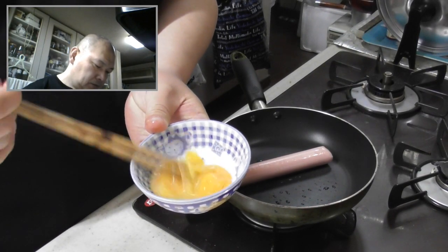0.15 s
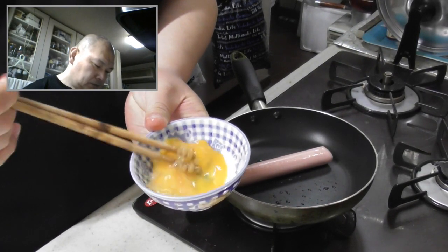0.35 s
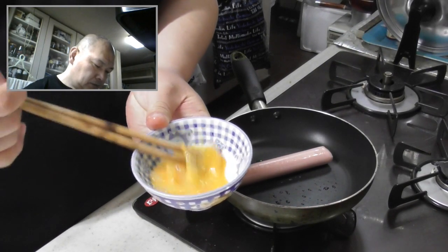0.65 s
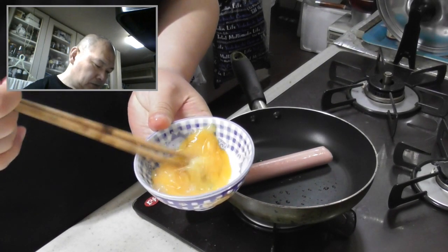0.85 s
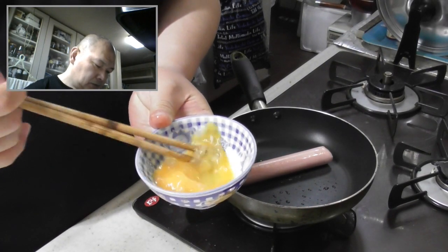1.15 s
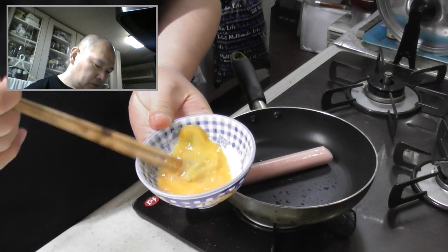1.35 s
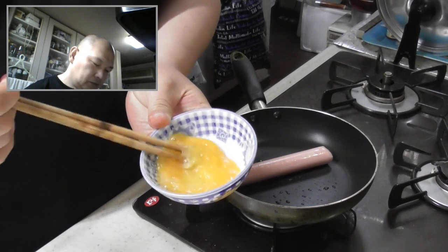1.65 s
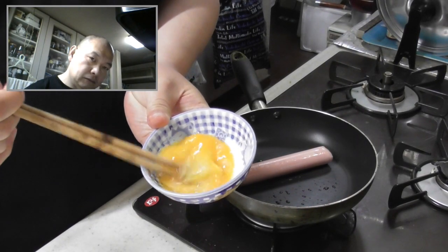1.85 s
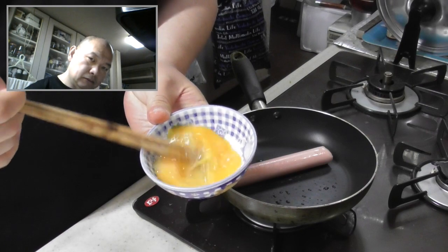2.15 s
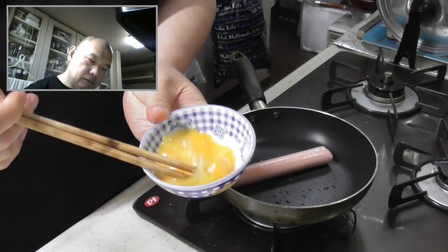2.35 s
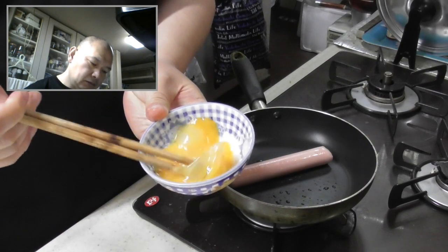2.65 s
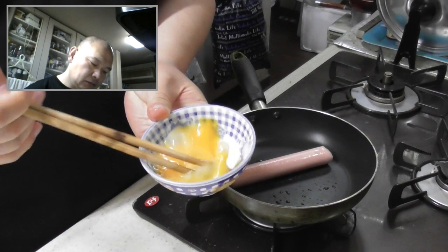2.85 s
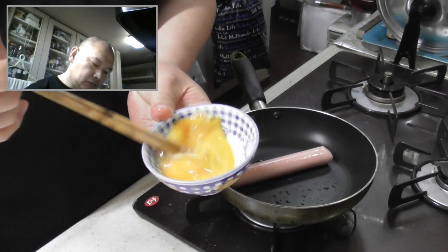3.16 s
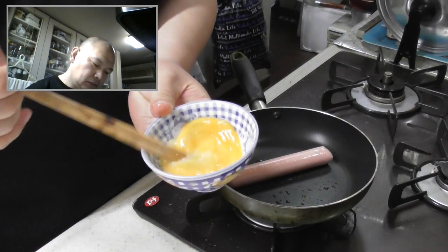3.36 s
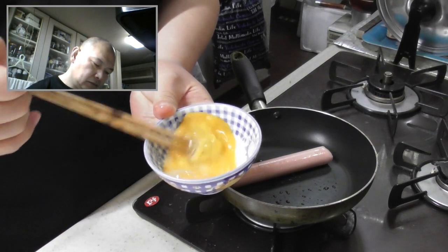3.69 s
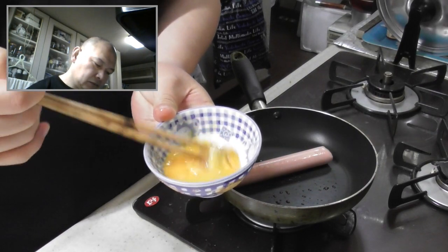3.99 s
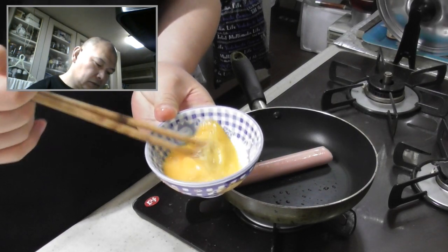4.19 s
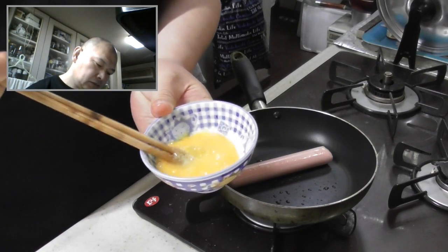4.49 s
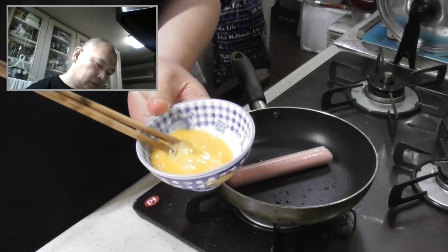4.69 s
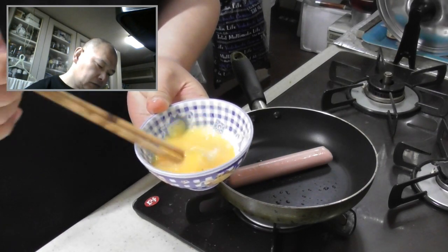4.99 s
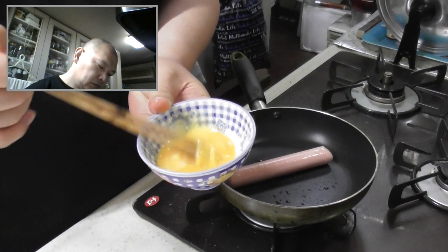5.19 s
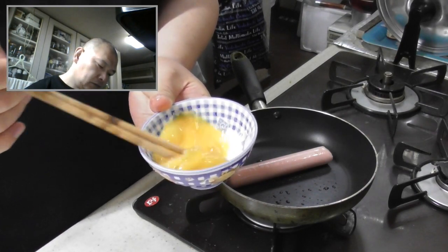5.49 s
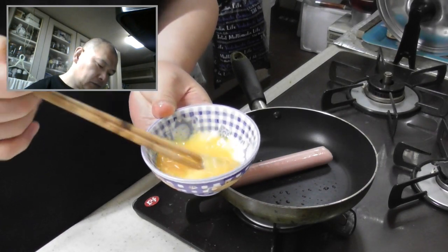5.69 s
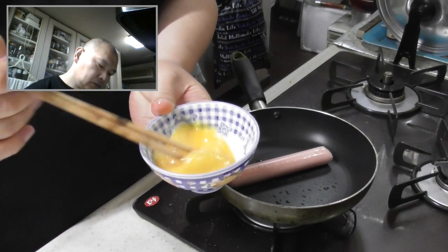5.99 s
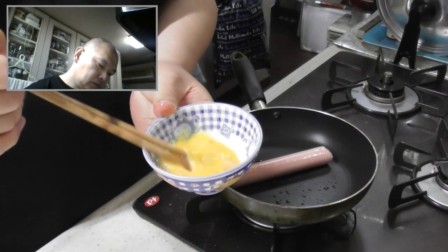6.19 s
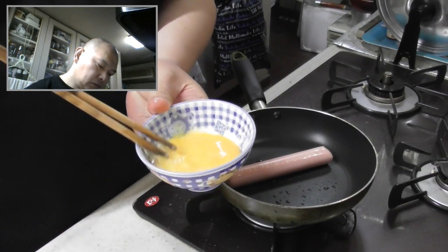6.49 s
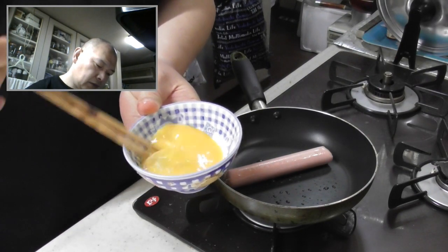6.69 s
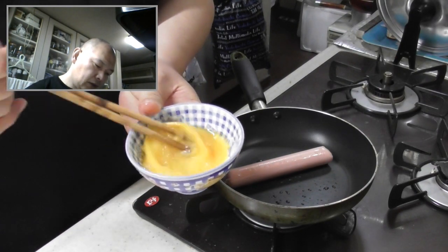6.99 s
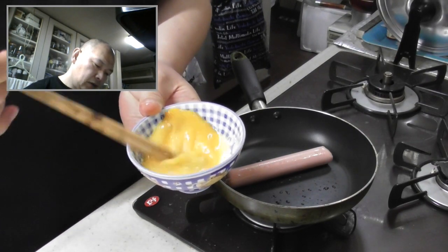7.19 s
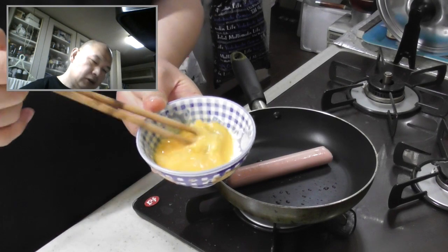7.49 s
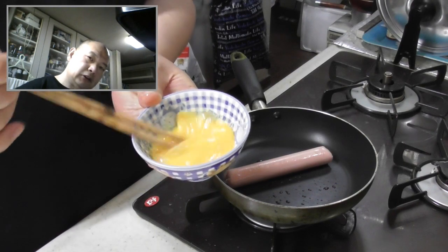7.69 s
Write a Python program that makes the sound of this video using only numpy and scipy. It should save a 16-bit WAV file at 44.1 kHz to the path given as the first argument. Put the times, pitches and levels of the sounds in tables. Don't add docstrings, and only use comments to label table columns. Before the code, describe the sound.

Close to a thin microphone, wooden chopsticks beat egg in a small porcelain bowl, about six strokes a second, each a sharp tick with a brief ceramic ring and wet slap. A pan sizzles steadily behind, with bright spits of fat. After three seconds the beating loosens into uneven bouts with gulping air bubbles. The small kitchen adds a short, hard echo.

```python
import sys
import numpy as np
from scipy import signal
from scipy.io import wavfile
from scipy.ndimage import uniform_filter1d

SR = 44100
rng = np.random.default_rng(int(sys.argv[2]) if len(sys.argv) > 2 else 0)


def amplitude_ratio(level_db):
    exponent = np.asarray(level_db, float) / 20
    return 10 ** exponent


def put_to_file(sound):
    columns = np.atleast_2d(sound).T
    safe = np.clip(columns, -1, 1)
    whole_steps = np.round(safe * 32767)
    wavfile.write(sys.argv[1], SR, whole_steps.astype(np.int16))


N = 346185

# time in seconds, level in dB.
FRY_LEVEL = [(0.0, -20), (1.38, -22), (1.94, -22), (2.58, -20), (3.0, -22), (3.52, -22), (3.96, -22),
             (4.6, -21), (4.91, -19), (5.1, -21.5), (5.55, -22.5), (6.34, -22), (6.6, -23), (7.15, -22),
             (7.48, -23), (7.85, -24.5)]
# frequency in Hz, level in dB per Hz.
PAN_COLOUR = [(24, -90), (40, -37.5), (742, -36), (1160, -21), (1570, -10), (2220, -13), (2790, -8),
              (3240, -13), (3670, -10.5), (5330, -6.5), (6350, 3), (7750, 10), (11800, -10.5), (13800, -10),
              (15600, -17)]
# frequency in Hz, width in Hz, boost in dB.
PAN_RESONANCES = [(1494, 92, 11), (2740, 87, 2), (3600, 190, 9.5), (4166, 230, 6), (4850, 61, 4.5),
                  (5410, 150, -4.5), (6600, 880, -0.5), (7770, 2320, -8)]
# frequency in Hz, time to fade by 60 dB in seconds.
KITCHEN_FADE = [(500, 0.13), (2000, 0.11), (5000, 0.18), (12000, 0.016)]
# start in
# seconds, level in dB.
BIG_SPITS = [(3.517, -3), (4.81, -3), (4.94, -3), (6.55, -4), (.0533, -1), (.0942, 0), (.3167, -1),
             (.4334, -1), (.5671, -2), (1.0236, -3), (1.0695, -2), (1.2216, -3), (1.3628, -2), (1.506, -2),
             (1.6526, -1), (2.1525, -1), (2.37, -2), (2.5496, -3), (2.8928, 1), (4.114, -3), (4.7536, -2),
             (4.8893, -2), (5.012, 0), (5.2964, -2), (5.4071, -2), (5.7648, -2), (5.8441, 0), (7.3467, -3),
             (7.4041, -3), (7.6889, 0)]
SMALL_SPITS = [.3651, .8954, 1.2012, 1.482, 1.6127, 1.6921, 1.8038, 2.0438, 2.4468, 2.9442, 2.9916, 3.1782,
               3.3902, 4.1051, 4.2792, 4.5286, 4.5875, 5.1472, 5.255, 5.3148, 5.4395, 5.7473, 5.9813,
               6.0721, 6.1893, 6.573, 6.8289, 7.0748, 7.427, 7.8271]
# start in seconds, level in dB, pitch in Hz.
STRAND_SNAPS = [(0.1336, -17, 1840), (0.2516, -12, 1870), (0.2974, -17, 1590), (0.3884, -15, 1620),
                (1.278, -14.5, 2810), (1.8043, -20, 2780), (2.2952, -22, 1490), (2.3286, -16, 1530),
                (2.3855, -19, 1920), (2.4758, -19, 2000), (2.5576, -13.5, 1850), (2.6275, -29, 1880),
                (2.7995, -17, 1880), (2.8404, -14, 1980), (3.0645, -16, 2760), (3.243, -17, 2620),
                (3.3692, -19.5, 2630), (3.526, -18, 2360), (3.7028, -16.5, 1560), (4.0867, -12, 2660),
                (4.53, -21, 2820), (4.587, -25, 1480), (5.511, -17, 1580), (5.5174, -19, 1910),
                (5.7473, -29, 1660), (5.7648, -22, 2800), (5.941, -21, 1920), (5.9683, -17, 3160),
                (6.1045, -10, 1950), (6.6765, -16, 1450), (6.696, -23, 1500), (6.7311, -20, 2640),
                (7.01, -22, 1900), (7.0174, -19, 1950), (7.1685, -18, 1880), (7.2789, -18, 2770),
                (7.3407, -16.5, 1960), (7.4739, -21, 1900), (7.5929, -19, 1810)]
# start in seconds, level in dB, pitch in Hz.
SLOSHES = [(6.141, -12, 2000), (.796, -22, 1480), (6.577, -21.5, 1660), (1.531, -12, 3420),
           (0.63, -24.5, 1660), (0.7848, -10.5, 1885), (.8125, -20, 1910), (0.913, -14.5, 1930),
           (1.2247, -10.5, 1910), (1.3348, -26, 2010), (1.3458, -20, 2200), (1.513, -14, 1900),
           (1.673, -22, 1980), (2.334, -21, 1590), (2.4927, -15.5, 1990), (0.0842, -7.5, 3170),
           (3.6173, -20, 1910), (3.7896, -23, 1880), (4.047, -20, 1920), (4.2113, -18.5, 1920),
           (4.33, -21, 1420), (4.373, -17, 1910), (4.393, -13, 1820), (4.8493, -25, 1740),
           (4.976, -21, 2300), (5.808, -18.5, 1930), (6.103, -30, 2080), (6.662, -19.5, 1890),
           (7.0804, -20.5, 1930), (7.1194, -23, 1750), (7.21, -28, 2020), (7.509, -20.5, 2300),
           (7.5247, -25, 1430), (7.599, -18, 1860)]
# start in seconds, level in dB, pitch in Hz,
# time to fade by 60 dB in seconds, rise in octaves per second.
GULPS = [(0.088, -6.5, 1340, 0.018, 11), (.252, -16, 1040, 0.022, 27), (0.78, -16, 855, 0.16, 30),
         (2.841, -18, 780, 0.069, 0.81), (2.873, -22.5, 777, 0.065, 1), (3.526, -21.5, 1190, 0.026, 8.8),
         (3.926, -24, 1140, 0.04, 7.8), (4.045, -27, 1013, 0.17, 8.7), (4.091, -26, 1058, 0.14, 4),
         (4.21, -20.5, 980, 0.016, 7), (4.331, -16.5, 1300, 0.061, 1.8), (4.372, -20.5, 1080, 0.024, 8),
         (4.53, -34, 1110, 0.033, 6.8), (5.316, -12.5, 1044, 0.054, 1.9), (5.497, -36, 710, 0.11, 1.3),
         (5.601, -26, 1010, 0.024, 5), (5.667, -19, 1590, .2, 0.53), (5.997, -12, 1380, 0.051, 12),
         (6.105, -25.5, 1160, 0.034, 8.8), (6.73, -26, 1250, 0.042, 3.4), (6.95, -17, 1300, 0.035, 4.8),
         (7.241, -25, 904, 0.043, 2.1), (7.522, -25, 1040, 0.025, 6)]
# start in seconds, level in dB, pitch in Hz, length in seconds.
BIG_POCKET = (5.824, -1.5, 1830, .0072)
# start in seconds, level in dB.
JOLTS = [(.0845, -48), (.4, -45), (0.5546, -45), (1.5299, -46), (2.1523, -53), (2.361, -49), (2.657, -51),
         (5.824, -43.5), (6.189, -46.5), (6.95, -48), (7.223, -56), (0.719, -38), (0.8814, -37.5),
         (1.036, -39.5), (1.2031, -35), (1.3653, -42), (1.6926, -34.5), (1.8587, -45), (2.1779, -47),
         (2.893, -37.5), (3.178, -37.5), (3.389, -38.5), (3.5588, -28), (3.7333, -35), (3.91, -39),
         (4.405, -44), (5.147, -44), (5.2978, -47), (5.3333, -39.5), (5.657, -42), (5.982, -41),
         (6.1386, -44), (6.573, -33), (6.8895, -47), (7.0434, -44), (7.3828, -50), (7.6887, -43)]
# frequency in Hz, level in dB.
TICK_COLOUR = [(300, 3), (900, -16.5), (1500, 10), (2500, -2), (3700, 18), (4600, 3), (7000, 2.5),
               (15000, -6)]
# frequency in Hz, level in dB, time to fade by 60 dB in seconds.
BOWL_DEEP = [(1586, -0.97, 0.1)]
BOWL_LOW = [(2270, -34, 0.012), (2740, 1, 0.019), (2857, -8, 0.021), (3286, 6, 0.008), (3630, -24, 0.19)]
BOWL_MID = [(3580, -2, .04), (3655, -9, .09), (3726, -4, .055), (3860, -9, .02)]
BOWL_HIGH = [(6320, -9, .04), (6400, -1, .028), (6480, -5, .03)]
# start in seconds,
# blow in dB, place on the bowl (low towards the wall, high towards the rim), egg slap in dB, slap pitch in Hz.
BEATING_STROKES = [(0.0836, -6.5, 0.4, -16, 1900), (.2279, -6, 1, -18.5, 1920),
                   (0.4, 0.5, -0.25, -15.5, 1720), (0.5545, -2, -0.5, -12, 1693),
                   (0.7183, 2.5, 0.5, -14.5, 1830), (0.8806, 1, -0.5, -19, 1684),
                   (1.036, -0.5, 1.1, -21.5, 2300), (1.183, -8, 1.8, -20, 1840),
                   (1.2017, 2.5, 0.2, -20, 2500), (1.3658, 2, 1, -24.5, 1560), (1.53, 1, 0.8, -30, 1870),
                   (1.6923, 2.5, -0.5, -20, 1820), (1.8596, -3.5, 0.5, -14.5, 1900),
                   (2.015, -10, 0.4, -26, 1910), (2.178, -5.5, 1, -18, 2330), (2.223, -8.5, 1.3, -19, 3380),
                   (2.3618, -3.5, 0.2, -32, 1900), (2.411, -19, -0.5, -18, 1780),
                   (2.432, -21, 3.5, -15, 1830), (2.654, -18.5, 4.5, -11.5, 1935),
                   (2.8164, -10, -0.1, -15.5, 1920), (2.9863, -7.5, -0.5, -22, 1550),
                   (3.1787, -4, -1, -10.5, 1800),
                   (3.39, -0.5, -1.36, -20, 2090), (3.5588, 2, 0.2, -19, 2180), (3.7323, 4, 2.2, -15.5, 1985),
                 (3.911, 2.5, 1.6, -20, 1526), (4.085, -16, 3.5, -21, 1890), (4.2563, -14, 0, -14, 1910),
                 (4.4051, -0.5, -0.3, -16, 1930), (5.1472, -1.5, -0.7, -41, 1990),
                 (5.334, -4, -1.16, -26.5, 1620), (5.439, -12, 0.5, -21, 1880),
                 (5.657, -3.5, -0.6, -19.5, 2000), (5.8067, -5, 0, -36, 1760), (5.981, -0.5, 0, -17, 2340),
                 (6.1389, 1.5, 0.7, -6.5, 2360), (6.258, -5.5, 0.3, -23, 2370),
                 (6.573, -0.5, -0.3, -9, 1940), (6.89, -2.5, -1, -33, 1600), (6.9492, -8, 0.1, -14, 1910),
                 (7.044, 2.5, 0.2, -12, 1980), (7.223, 1, 2, -30, 2100), (7.3834, -4, 0, -26, 2010),
                 (7.4034, -12, 2, -11, 2710), (7.6894, 0, 1, -16.5, 1697), (7.763, -13, 2.85, -18, 2350)]
# start in seconds, blow in dB, place on the bowl.
GRAZES = [(.5327, -20, 1.8), (.7936, -23, 2.5), (1.338, -16, 5), (1.5, -16, -1), (1.592, -23, 3),
          (2.0662, -17.5, -1.1), (2.2004, -16, -1.5), (3.2613, -13.5, 0.5), (4.019, -16.5, 1),
          (4.3902, -14, -2), (5.2974, -14, 1.4), (6.105, -10, 2.2), (6.6644, -15.5, 2.2),
          (6.8016, -28.5, -2), (7.1197, -9, 0.42), (7.196, -16, -0.5), (7.21, -4.5, 0.5),
          (7.5224, -11, 2.3)]
STROKES = BEATING_STROKES

FRY_MEAN_DB, BODY_DB, BODY_SWING = -21.5, -21.5, 2.02
STEADY_BELOW_HZ = 800
LULL_DB, LULL_LEAD_S, LULL_S = -4.5, .012, 0.0039
TICKS_PER_S, TICKS_DB, TICKS_HZ = 60, -13.5, 9500
SMALL_SPIT_DB, SPIT_HZ, SPIT_SPREAD = -4.5, 7500, .06
SPIT_TILT_DB = 5
HOB_ECHO_S, HOB_ECHO_DB = .0022, -5
SLAP_LAG_S, SLAP_S = 0.001633, 0.0076
GULP_WAVER = .035
GRAZE_TICK_DB = 2
MID_DB, LOW_DB, HIGH_DB = -9.5, -11.5, -6
MID_DB_PER_PLACE, LOW_DB_PER_PLACE, HIGH_DB_PER_PLACE = -8, 4.5, -4.5
SECOND_STICK_DB, SECOND_STICK_S = -2.5, .003
DETUNE, RING_ROUGH = .005, .55


def evened(x):
    return x / np.sqrt(np.mean(x ** 2) + 1e-20)


def read(points, hz):
    f, value = np.transpose(points)
    return np.interp(np.log(hz + 1), np.log(f + 1), value)


def add(mix, s, sound):
    part = mix[round(s * SR):][:len(sound)]
    part += sound[:len(part)]


def causal(db):
    log_gain = np.log(amplitude_ratio(np.maximum(np.r_[db, db[-2:0:-1]], -100)))
    return np.fft.ifft(np.exp(log_gain - 1j * signal.hilbert(log_gain).imag)).real[:len(db)]


def ring(modes, t, chance):
    out = 0
    for (hz, db, t60), c in zip(modes, chance):
        tuned = hz * (1 + DETUNE * np.sin(40 * c))
        out = out + amplitude_ratio(db + 2.04 * c - 60 * t / t60) * np.sin(2 * np.pi * tuned * t + 7 * c)
    return out


def blip(t, hz, t60, rise, swell):
    pitch = hz * 2 ** (rise * t)
    fade = amplitude_ratio(-60 * t / max(t60, .005))
    return np.sin(2 * np.pi * np.cumsum(pitch) / SR) * (1 - np.exp(-t / swell)) * fade


def kitchen(x):
    taps = np.zeros(SR // 2)
    at = np.arange(160, len(taps) - 20, 20)
    taps[at + rng.integers(0, 20, len(at))] = rng.choice([-1., 1.], len(at))
    hz, t, z = signal.stft(taps, SR, nperseg=128)
    tail = signal.istft(z * amplitude_ratio(-60 * t / read(KITCHEN_FADE, hz)[:, None]), SR, nperseg=128)[1]
    return signal.fftconvolve(x, tail / np.linalg.norm(tail))[:N]


def pan_colour(hz):
    peaks = sum(db / (1 + (2 * (hz - f) / width) ** 2) for f, width, db in PAN_RESONANCES)
    return read(PAN_COLOUR, hz) + peaks


def lull(times):
    dip = 0
    for s, db, *_ in STROKES:
        firmness = 1 / (1 + amplitude_ratio(-db - 12))
        dip = dip + LULL_DB * firmness * np.exp(-((times - s + LULL_LEAD_S) / LULL_S) ** 2)
    return dip


def sizzle():
    clumps = evened(uniform_filter1d(rng.standard_normal(N), 250))
    crowding = amplitude_ratio(4.0 * clumps + 1.5 * evened(uniform_filter1d(clumps, 1200)))
    bursting = rng.random(N) < 2500 / SR * crowding
    strength = amplitude_ratio(4.2 * np.minimum(rng.exponential(1, N), 4.3))
    crackle = bursting * rng.choice([-1, 1], N) * strength

    t = np.arange(60) / SR
    tones = np.geomspace(1500, 14000, num=12)
    which = rng.integers(0, len(tones), N)
    fizz = np.zeros(N)
    for k, hz in enumerate(tones):
        tone = np.sin(2 * np.pi * hz * t) * np.exp(-t * hz / 2.2)
        fizz += evened(signal.oaconvolve(crackle * (which == k), tone)[:N]) * np.sqrt(hz)

    hiss = amplitude_ratio(2.0 + 0.99 * evened(uniform_filter1d(clumps, 500))) * rng.standard_normal(N)
    raw = amplitude_ratio(-5.5) * evened(crackle) + amplitude_ratio(-5.5) * evened(fizz) + hiss
    hz, frames, z = signal.stft(raw, SR, nperseg=512)
    z = z / np.sqrt(uniform_filter1d((abs(z) ** 2).mean(1), 9))[:, None]

    fry_db = np.interp(frames, *np.transpose(FRY_LEVEL))
    high = (1 / (1 + (5200 / (hz + 1)) ** 8))[:, None]
    swinging = 1 / (1 + (STEADY_BELOW_HZ / (hz[:, None] + 1)) ** 4)
    body_db = BODY_DB + lull(frames) + BODY_SWING * (fry_db - FRY_MEAN_DB) * swinging
    level_db = high * fry_db + (1 - high) * body_db
    patches = uniform_filter1d(uniform_filter1d(rng.standard_normal(z.shape), 5, 0), 8, 1)
    level_db = level_db + (1.2 + .9 * (1 - high)) * evened(patches)

    shape = amplitude_ratio(pan_colour(hz))[:, None]
    shape = shape / np.sqrt((shape ** 2).sum())
    return amplitude_ratio(-1.0) * signal.istft(z * shape * amplitude_ratio(level_db), SR, nperseg=512)[1][:N]


def ticks():
    t = np.arange(14) / SR
    strength = amplitude_ratio(4.5 * np.minimum(rng.exponential(1, N), 3))
    bursting = (rng.random(N) < TICKS_PER_S / SR) * strength
    fry_db = np.interp(np.arange(N) / SR, *np.transpose(FRY_LEVEL))
    busy = amplitude_ratio(1.5 * (fry_db - FRY_MEAN_DB))
    pinprick = np.sin(2 * np.pi * TICKS_HZ * t) * np.hanning(len(t))
    return amplitude_ratio(TICKS_DB) * signal.oaconvolve(bursting * busy, pinprick)[:N]


def spits():
    out, t, f = np.zeros(N), np.arange(700) / SR, np.fft.rfftfreq(2048, 1 / SR)
    snap = causal(.6 * pan_colour(f) + SPIT_TILT_DB * np.log2(f / SPIT_HZ + .01))[:len(t)]
    snap /= abs(snap).max()
    drops = BIG_SPITS + [(s, SMALL_SPIT_DB) for s in SMALL_SPITS]
    for (s, db), c in zip(drops, rng.standard_normal((len(drops), len(t)))):
        hz = SPIT_HZ * (1 + SPIT_SPREAD * abs(c[0]))
        bright = np.sin(2 * np.pi * hz * t) * amplitude_ratio(-60 * t / .003)
        spray = evened(np.convolve(snap, c)[:len(t)]) * amplitude_ratio(-60 * t / .016)
        drop = snap + bright + amplitude_ratio(-14) * spray
        drop = drop / abs(drop).max()
        for lag, echo_db in (0, 0), (HOB_ECHO_S, HOB_ECHO_DB):
            add(out, s + lag + .001, amplitude_ratio(db + echo_db) * drop)
    return signal.sosfilt(signal.butter(2, 1800, "highpass", fs=SR, output="sos"), out)


def froth():
    t, out = np.arange(500) / SR, np.zeros(N)
    for hz in np.geomspace(900, 3800, num=10):
        strength = amplitude_ratio(2.0 * np.minimum(rng.exponential(1, N), 3.5))
        popping = (rng.random(N) < 9 / SR) * strength
        pop = blip(t, hz, 0.013, rise=11, swell=0.00016)
        out += signal.oaconvolve(popping, pop)[:N] * amplitude_ratio(read(PAN_COLOUR, hz))
    return amplitude_ratio(-17.5) * out


def wet_ticks():
    out, t = np.zeros(N), np.arange(1200) / SR
    wet = signal.butter(2, [1000, 3900], "bandpass", fs=SR, output="sos")
    for (s, db, hz), c in zip(STRAND_SNAPS, rng.standard_normal((len(STRAND_SNAPS), len(t)))):
        splash = signal.sosfilt(wet, c * amplitude_ratio(1.5 - 60 * t / 0.029))
        add(out, s, amplitude_ratio(db - 4) * (splash + blip(t, hz, 0.037, rise=6.6, swell=0.00068)))
    return out


def gulps():
    out, t = np.zeros(N), np.arange(5000) / SR
    for (s, db, hz, t60, rise), c in zip(GULPS, rng.standard_normal((len(GULPS), len(t)))):
        wobble = 1 + .35 * evened(uniform_filter1d(uniform_filter1d(c, 150), 150))
        wavering_hz = hz * (1 + GULP_WAVER * evened(uniform_filter1d(c[::-1], 200)))
        tone = blip(t, wavering_hz, t60, rise, swell=0.00042)
        overtone = amplitude_ratio(0.24 * rise - 2) * blip(t, 1.6 * hz, 0.28 * t60, 1.1 * rise, swell=0.00048)
        add(out, s, amplitude_ratio(db - 2.5) * wobble * (tone + overtone))
    return out


def squeeze():
    out, t = np.zeros(N), np.arange(3000) / SR
    s, db, hz, length = BIG_POCKET
    held = 1 / (1 + (t / length) ** 14) + amplitude_ratio(-11 - 60 * t / .07)
    add(out, s, amplitude_ratio(db) * held * blip(t, hz, .3, rise=1.5, swell=.0018))
    return out


def slaps():
    out, t = np.zeros(N), np.arange(5000) / SR
    wet = signal.butter(4, [1300, 3400], "bandpass", fs=SR, output="sos")
    deep_hz = BOWL_DEEP[0][0]
    pockets = [(s + SLAP_LAG_S, db, hz) for s, _, _, db, hz in STROKES] + SLOSHES
    held = 1 / (1 + (t / SLAP_S) ** 6.0)
    for (s, db, hz), c in zip(pockets, rng.standard_normal((len(pockets), len(t)))):
        wobble = 1 + .2 * evened(uniform_filter1d(c, 120))
        wavering_hz = hz * (1 + GULP_WAVER * evened(uniform_filter1d(c[::-1], 90)))
        tone = wobble * held * blip(t, wavering_hz, 0.078, rise=0.97, swell=0.00091)
        splash = signal.sosfilt(wet, c * amplitude_ratio(-0.5 - 60 * t / 0.037))
        near_deep = 1 / (1 + ((hz - deep_hz) / 120) ** 2)
        add(out, s, amplitude_ratio(db + 2.0) * (tone + splash + near_deep * ring(BOWL_DEEP, t, [0])))
    return out


def thuds():
    out, push = np.zeros(N), np.hanning(40)
    for s, db in JOLTS:
        add(out, s + 0.0013, amplitude_ratio(db + 11.5) * push)
    return out


def bowl():
    out, t = np.zeros(N), np.arange(9000) / SR
    clack_t = t[:2000]
    tick = causal(read(TICK_COLOUR, np.fft.rfftfreq(2048, 1 / SR)))
    tick /= abs(tick).max()
    hits = [(*row[:3], 0) for row in STROKES] + [(*row, GRAZE_TICK_DB) for row in GRAZES]
    for (s, db, place, tick_db), c in zip(hits, rng.uniform(-0.9154, 1, (len(hits), 409))):
        scrape = np.r_[1, .4 * c[10:] * np.exp(-np.arange(399) / 90.)]
        add(out, s, amplitude_ratio(db + tick_db - 3.5) * np.convolve(tick, scrape))

        modes = amplitude_ratio(MID_DB + MID_DB_PER_PLACE * place) * ring(BOWL_MID, t, c)
        modes += amplitude_ratio(LOW_DB + LOW_DB_PER_PLACE * place) * ring(BOWL_LOW, t, c[3:])
        modes += amplitude_ratio(HIGH_DB + HIGH_DB_PER_PLACE * place) * ring(BOWL_HIGH, t, c[8:])
        rough = 1 + RING_ROUGH * np.interp(t, np.arange(100) * .0025, 1.7 * c[100:200])
        add(out, s, amplitude_ratio(db) * rough * modes * (1 - np.exp(-t / 0.0017)))

        second_lag = SECOND_STICK_S * (1.4 + c[11])
        for lag, stick_db, u in (0, 0, c[12:]), (second_lag, SECOND_STICK_DB, c[40:]):
            wood = [(2700 + 1000 * v, 0, .018) for v in u[:6]]
            clack = ring(wood, clack_t, u[8:]) * (1 - np.exp(-clack_t / 0.00067))
            add(out, s + lag, amplitude_ratio(db + tick_db + stick_db - 15) * clack)
    return out


def scene():
    thin = signal.butter(3, 620, "highpass", fs=SR, output="sos")
    egg = slaps() + gulps() + squeeze() + froth() + wet_ticks()
    near = signal.sosfilt(thin, bowl() + egg + spits() + ticks())
    return (near + amplitude_ratio(-13.5) * kitchen(near) + thuds() + sizzle())[None]


def low_pass(x):
    return signal.sosfilt(signal.butter(12, 15740, fs=SR, output="sos"), x)


def record(dry):
    knee, top = .75, 1.0
    over = np.maximum(abs(dry) - knee, 0)
    squashed = dry - np.sign(dry) * (over - (top - knee) * np.tanh(over / (top - knee)))
    hissing = squashed + amplitude_ratio(-56.5) * rng.standard_normal(dry.shape)
    limited = signal.oaconvolve(hissing, signal.firwin(401, 15900, fs=SR)[None], "same")
    return low_pass(limited)


dry = scene()
out = record(dry)
put_to_file(out)
```